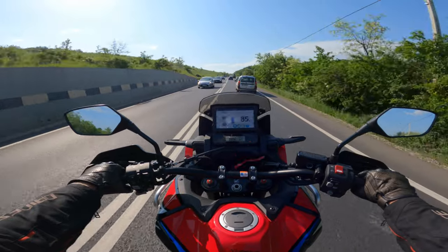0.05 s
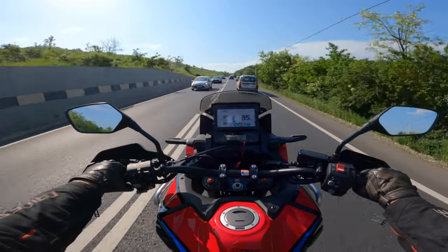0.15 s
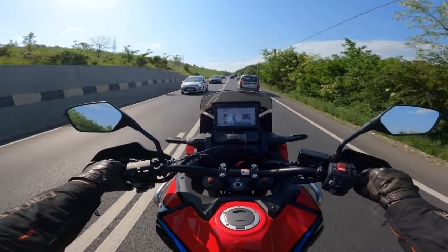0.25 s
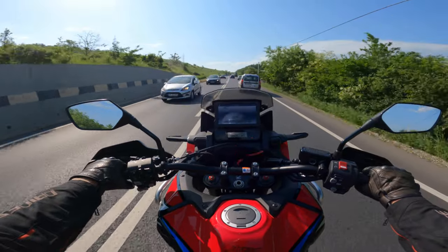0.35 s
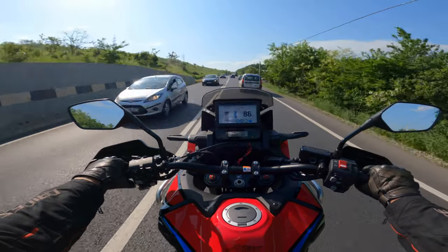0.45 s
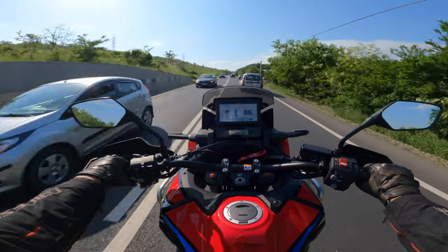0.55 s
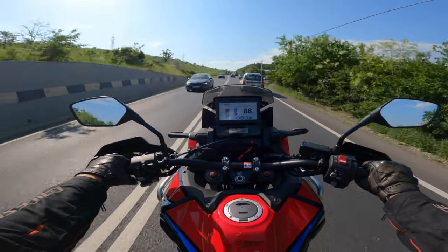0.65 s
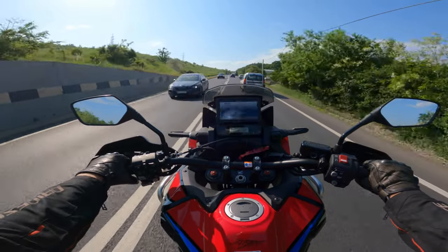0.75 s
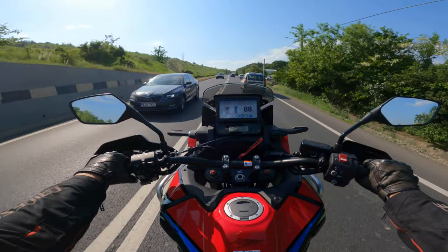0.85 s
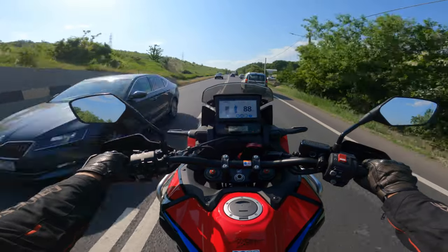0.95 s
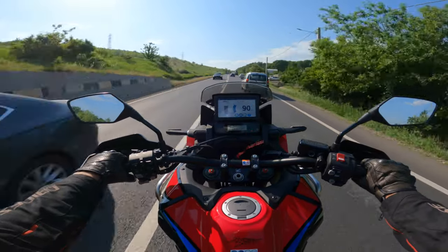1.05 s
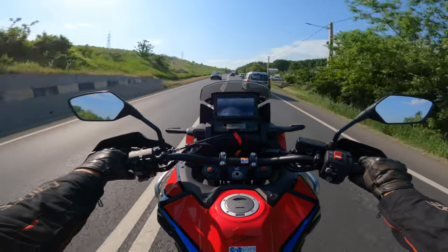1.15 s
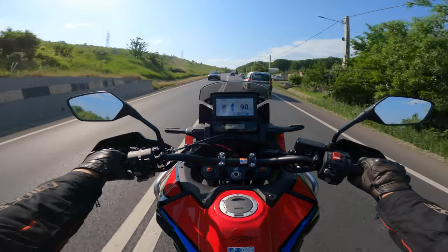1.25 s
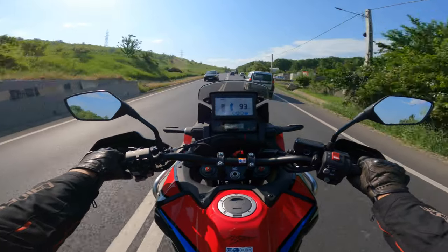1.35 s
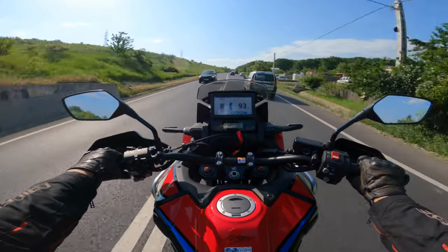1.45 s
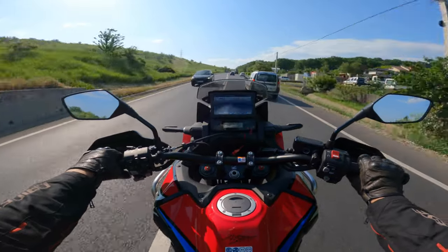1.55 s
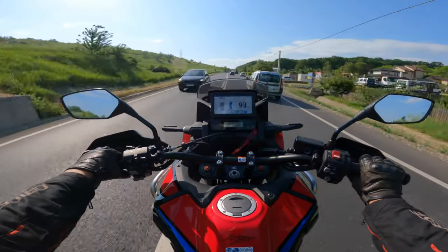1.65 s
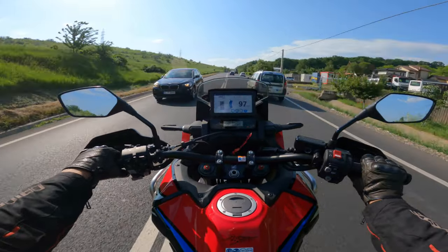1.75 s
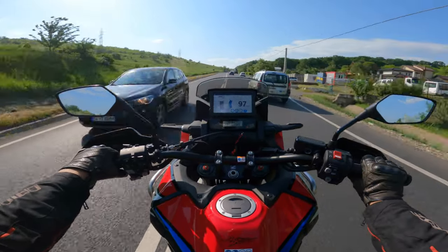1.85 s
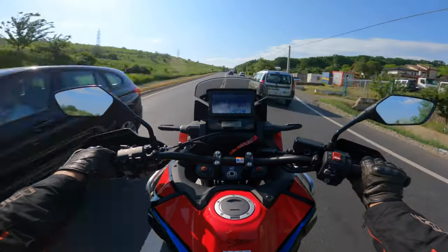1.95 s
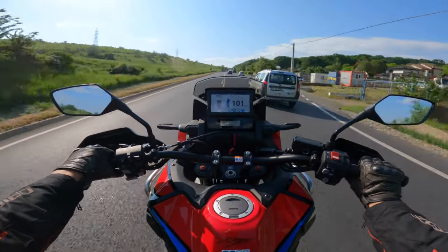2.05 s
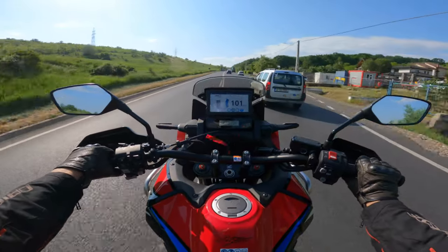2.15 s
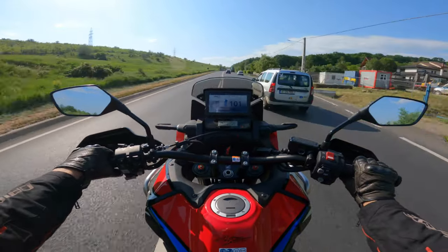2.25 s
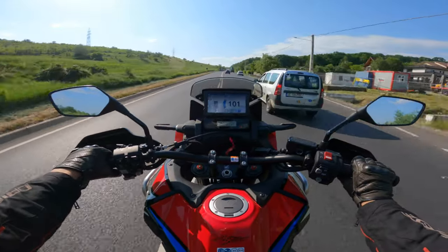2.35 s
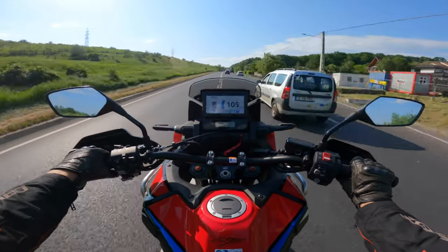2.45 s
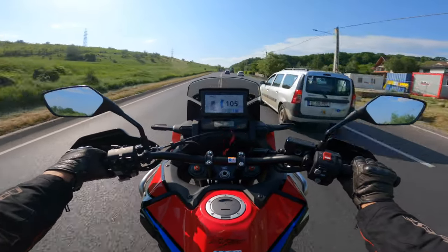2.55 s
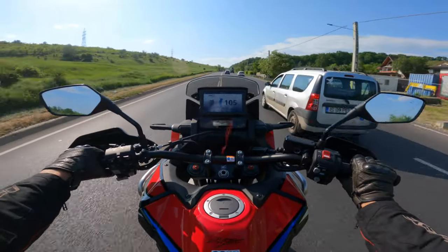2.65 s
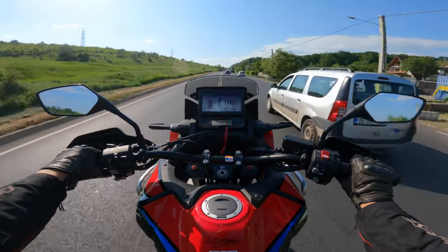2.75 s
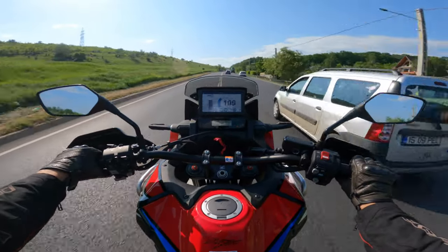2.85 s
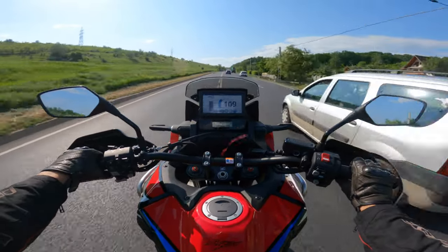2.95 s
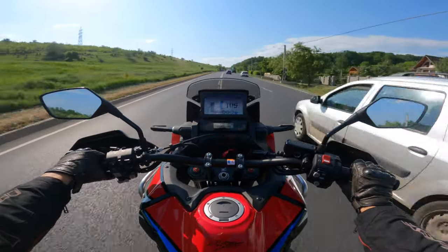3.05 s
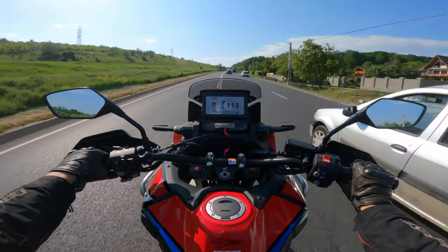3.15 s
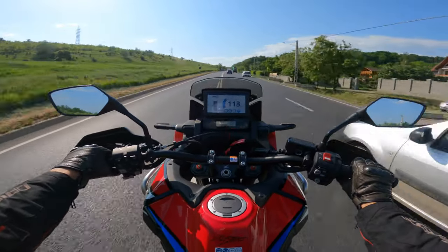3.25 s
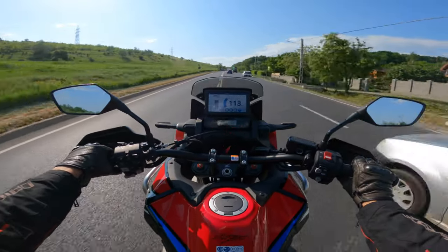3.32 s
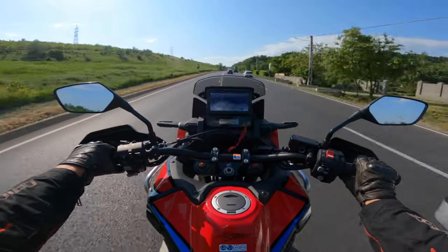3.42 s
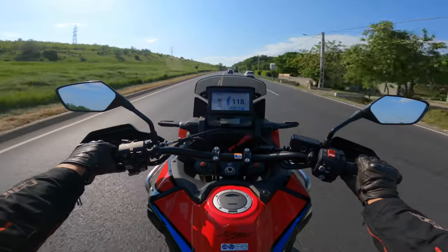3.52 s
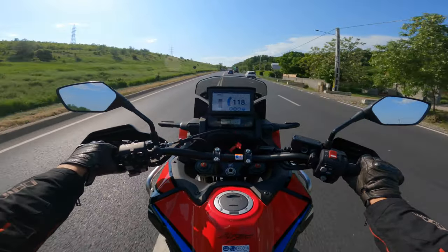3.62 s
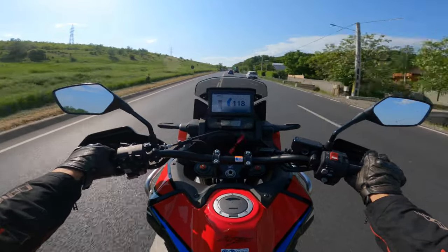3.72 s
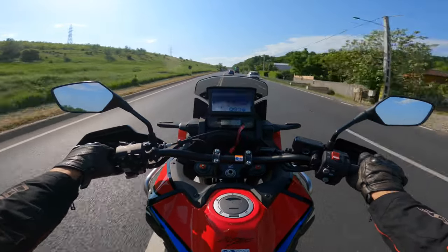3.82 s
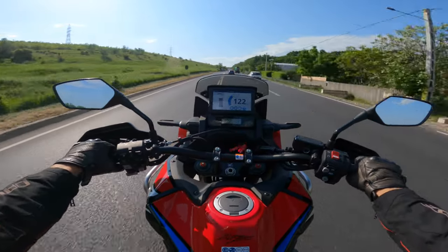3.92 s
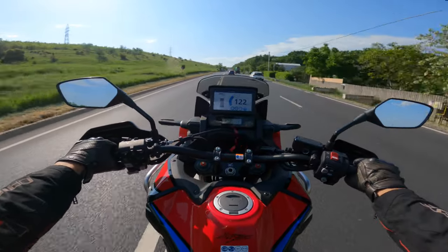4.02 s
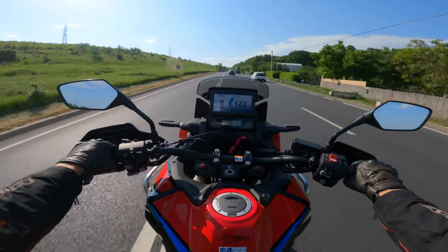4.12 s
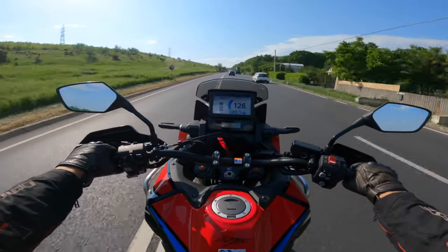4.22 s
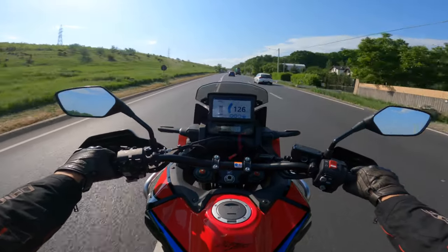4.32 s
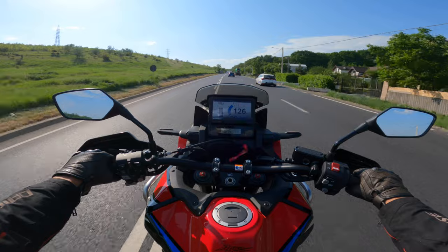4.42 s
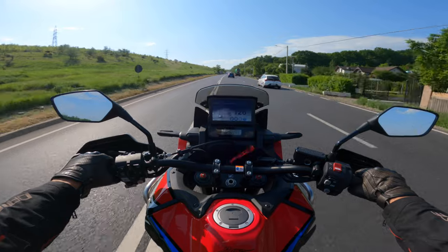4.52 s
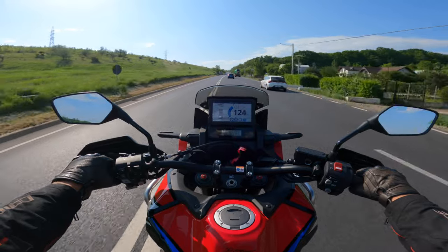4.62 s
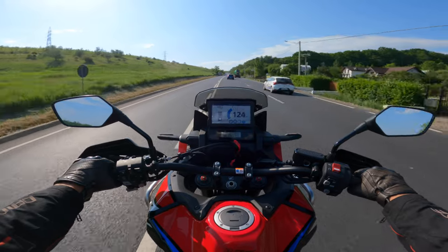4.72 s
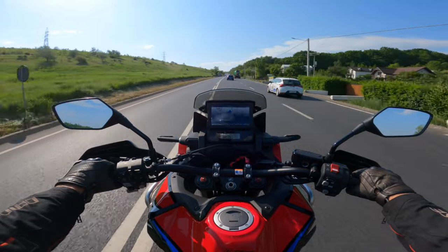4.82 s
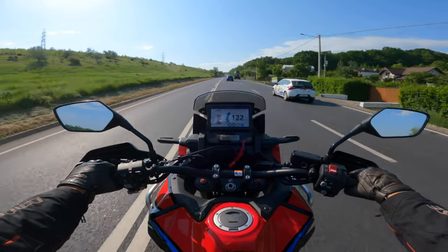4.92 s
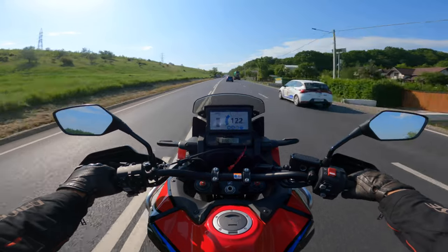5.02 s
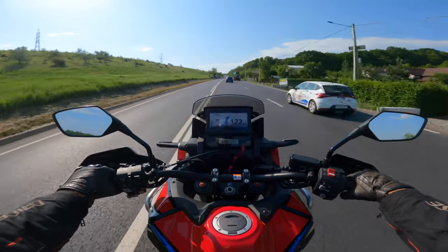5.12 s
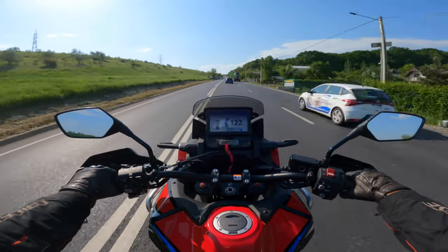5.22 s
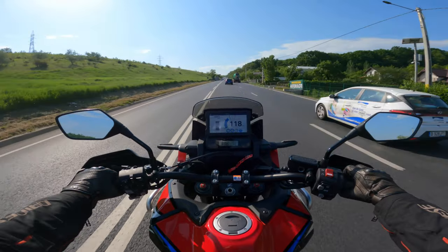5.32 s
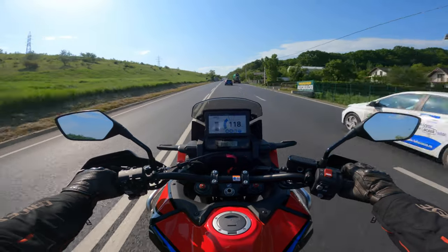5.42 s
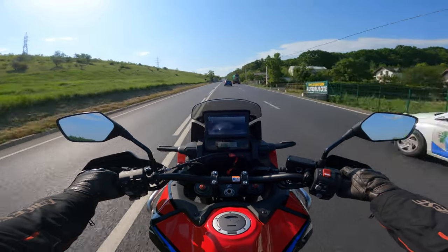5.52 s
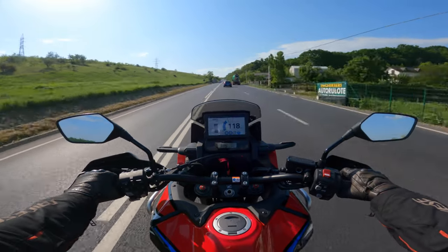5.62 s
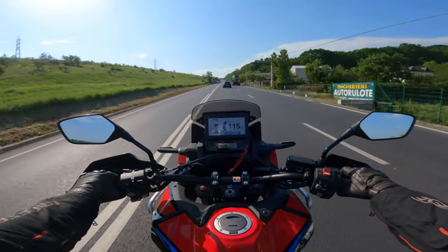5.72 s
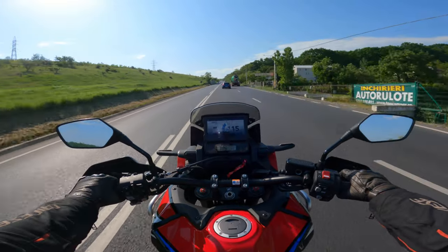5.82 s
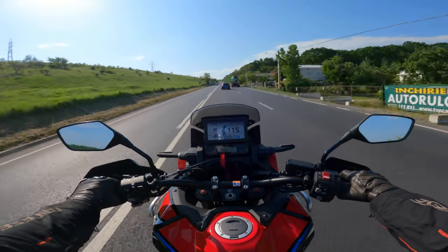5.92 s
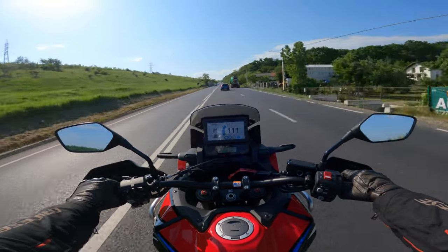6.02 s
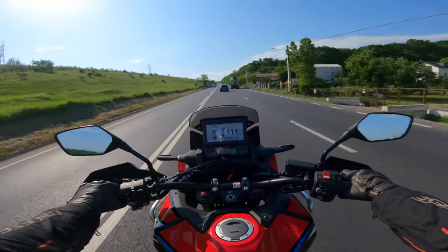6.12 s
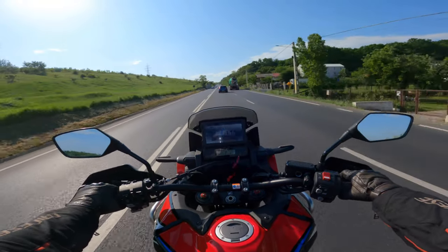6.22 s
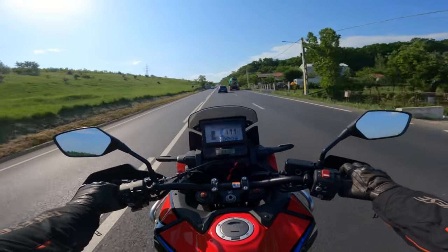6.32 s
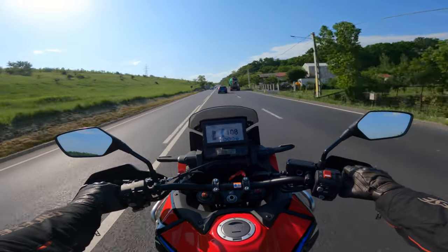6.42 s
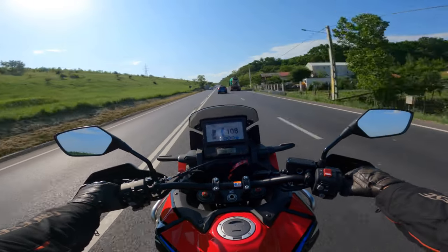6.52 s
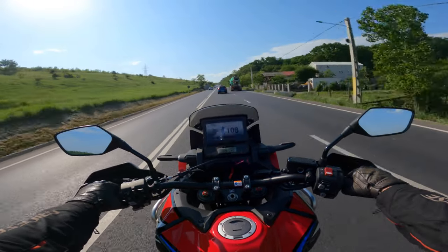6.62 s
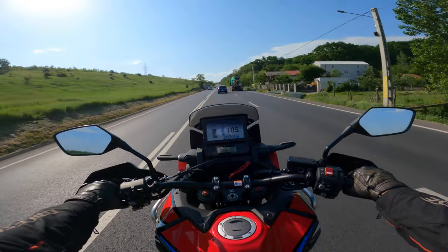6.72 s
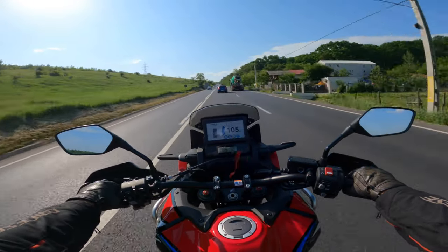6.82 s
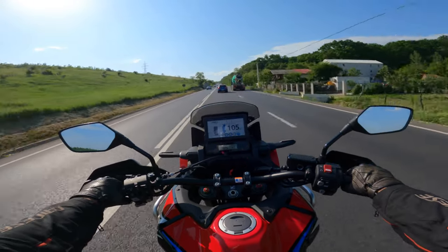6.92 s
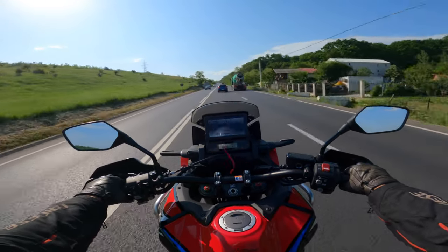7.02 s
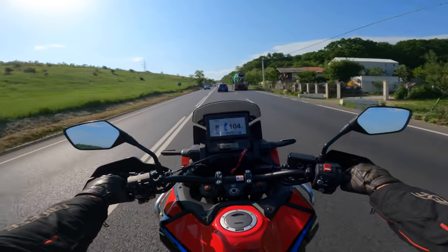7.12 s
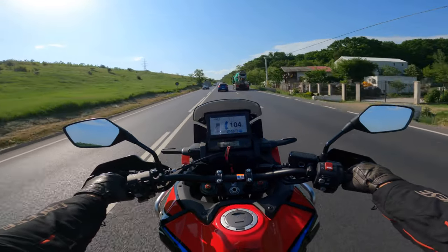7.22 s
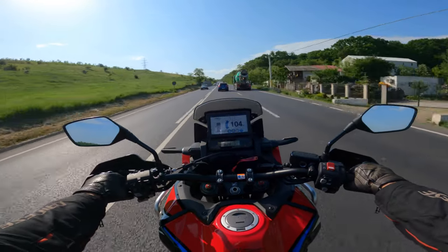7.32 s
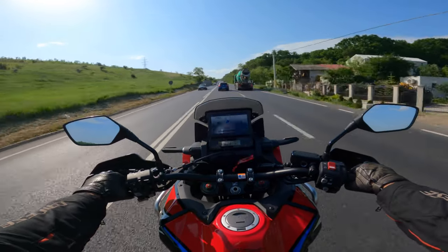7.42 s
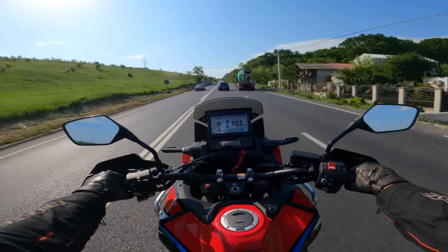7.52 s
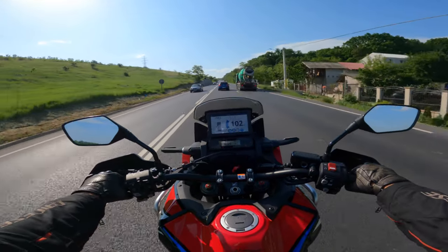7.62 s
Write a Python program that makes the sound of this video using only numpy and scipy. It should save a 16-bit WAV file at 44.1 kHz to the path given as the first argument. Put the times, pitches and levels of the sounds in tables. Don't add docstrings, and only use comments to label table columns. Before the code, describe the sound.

On an open road, a close stereo microphone at the rider's seat catches a twin-cylinder motorcycle. A soft uneven throb under rushing air grows steadily louder and higher, with hissing exhaust puffs and faint swishes of oncoming cars. It peaks around four seconds, then the throttle shuts and the engine sinks in pitch under wind, drive whine, cloth crackle and tiny metallic ticks. A firm knock and brief stabs of gas come near the end.

```python
import sys
import numpy as np
from scipy import signal
from scipy.fft import rfft, irfft, next_fast_len
from scipy.io import wavfile
from scipy.ndimage import uniform_filter1d

SR = 44100
rng = np.random.default_rng(int(sys.argv[2]) if len(sys.argv) > 2 else 0)


def convert_level_to_amplitude(level_db):
    exponent = np.asarray(level_db, float) / 20
    return 10 ** exponent


def inscribe(sig):
    pcm = np.round(np.clip(np.atleast_2d(sig).T, -1, 1) * 32767)
    wavfile.write(sys.argv[1], SR, pcm.astype(np.int16))


N = 337806
TIME_S = np.arange(N) / SR

# start_s, cycle_hz (four-stroke cycles), effort_db
ENGINE_RUN = [(0, 29.45, -36.5), (.87, 31.7, -29.5), (1.3, 32.95, -28), (1.54, 33.88, -26.5),
              (2.67, 38.4, -25), (3.67, 42.55, -21.5), (3.99, 43.9, -21), (4.19, 44.45, -23),
              (4.39, 44.33, -26.5), (4.88, 43.4, -31.5), (4.98, 41.35, -34), (5.1, 42.09, -31),
              (5.8, 39.57, -31.5), (6.76, 36.6, -34), (6.87, 38.56, -32.5), (6.96, 36.94, -33),
              (7.3, 36.3, -34), (7.66, 35.13, -37.5)]
# start_s, opening (0-1), slack (0-1, drive line neither pulling nor braking)
THROTTLE_HAND = [(0, 0.9, 0.8), (.5, 0.74, 0.48), (1.3, 0.64, 0.27), (1.5, 0.81, 0.15), (4.1, 0.88, 0.01),
                 (4.4, 1, 0.7), (4.95, .4, .9), (5.03, 0.23, 0.12), (6.82, 0, 0.14), (6.88, 0.6, .7),
                 (7.3, 0.2, .7), (7.45, 0.5, .1), (7.66, 0.3, 0.2)]
# pitch_hz, left_over_right_db
PORT_LEAN = [(60, -4), (92, 0.5), (140, 5.5), (210, 3.5), (330, 1), (500, 0), (770, -1), (1170, -5.5),
             (1790, 3), (2740, -1), (4190, 2.5), (6410, -1.5), (9810, 1), (15000, 1.5)]
# pitch_hz, lead_radians
PORT_LEAD = [(0, 3), (690, -0.53), (1200, 4), (1800, 4.5), (2700, 5.5), (5200, 4), (8100, 12.5), (16000, 4)]


def evened(x):
    return x / np.sqrt(np.mean(x ** 2) + 1e-20)


def read(points, hz):
    f, value = np.transpose(points)
    return np.interp(np.log(hz + 1), np.log(f + 1), value)


def curves(rows):
    s, *columns = np.transpose(rows)
    return [np.interp(TIME_S, s, column) for column in columns]


def drift(hz, channels=1):
    chance = rng.standard_normal((channels, N + SR))
    slow = signal.lfilter(*signal.butter(2, hz, fs=SR), chance)
    return evened(slow[:, SR:])


def band(x, lo_hz, hi_hz):
    edges = [lo_hz, min(hi_hz, SR / 2.1)]
    return signal.sosfilt(signal.butter(2, edges, "bandpass", fs=SR, output="sos"), x)


def treble(x, above_hz):
    return signal.sosfiltfilt(signal.butter(2, above_hz, "highpass", fs=SR, output="sos"), x)


def panned(db, left_right_db):
    return convert_level_to_amplitude(db + np.array([[left_right_db / 2], [-left_right_db / 2]]))


def noise(colour, patchy_db):
    # pitch_hz, likeness (0-1)
    likeness = [(60, 0.14), (200, 0.58), (400, 1), (700, 0.75), (1250, 0.82), (1900, 0.53), (2700, 1),
                (4400, 0.78), (6800, 0.17), (15000, .3)]
    frames, hz = N // 256 + 5, np.fft.rfftfreq(1024, 1 / SR)
    a, b, c, d, patches = rng.standard_normal((frames, 513, 5)).T
    patches = uniform_filter1d(patches, size=10, axis=0)
    patches = evened(uniform_filter1d(patches, size=10, axis=1))
    same = np.clip(read(likeness, hz), -1, 1)[:, None]
    left, own = a + 1j * b, c + 1j * d
    delayed = left * np.exp(-1j * read(PORT_LEAD, hz))[:, None]
    right = same * delayed + np.sqrt(1 - same ** 2) * own
    z = np.array([left, right])
    z *= convert_level_to_amplitude(read(colour, hz)[:, None] + patchy_db * patches)
    z *= convert_level_to_amplitude(np.outer([.5, -.5], read(PORT_LEAN, hz)))[:, :, None]
    return signal.istft(z, nperseg=1024, noverlap=768)[1][:, :N]


def ports(x):
    margin = 2048
    x = np.pad(x, margin, "reflect")
    size = next_fast_len(len(x), True)
    hz = np.fft.rfftfreq(size, 1 / SR)
    half = convert_level_to_amplitude(read(PORT_LEAN, hz) / 2) * np.exp(.5j * read(PORT_LEAD, hz))
    return irfft(rfft(x, size) * np.array([half, 1 / half]), size)[:, margin:margin + N]


def fuzzy_line(hz, width_hz, clean):
    wobble = drift(width_hz, channels=2)
    angle = 2 * np.pi * np.cumsum(hz * np.ones(N)) / SR
    return evened((clean + wobble[0]) * np.cos(angle) + wobble[1] * np.sin(angle))


def law(usual_db, share, shut_db, slack_db, speed_db):
    usual_effort_db, usual_hz = -30, 37
    hz, effort_db = curves(ENGINE_RUN)
    throttle, slack = np.clip(curves(THROTTLE_HAND), 0, 1)
    level_db = usual_db + share * (effort_db - usual_effort_db)
    level_db = level_db + shut_db * (1 - throttle) + slack_db * slack
    return level_db + speed_db * np.log2(hz / usual_hz)




def wind():
    wind_law = (-43.5, 0.33, 3.4, 3.2, 14)
    # pitch_hz, level_db (per Hz)
    wind_colour = [(10, -28), (22, -11), (40, 10.5), (70, 6.5), (110, -1.5), (160, -21.5), (250, -31),
                   (500, -60)]
    # centre_s, more_db, half_length_s
    gusts = [
        (1.013, 1, 0.12),
        (1.752, 2.5, .1),
        (2.126, 5, 0.07),
        (4.204, 2.5, .15),
        (4.623, 2, 0.09),
        (4.946, 2, 0.17),
        (5.733, 4.5, 0.055),
        (6.61, 5.5, .05),
        (6.767, 5.5, .04),
        (7.4, 4.5, .07),
    ]
    size = next_fast_len(N, True)
    hz = np.fft.rfftfreq(size, 1 / SR)
    shared, *own = rng.standard_normal((3, size))
    lumps = irfft(rfft(np.array(own) + shared / 2) * convert_level_to_amplitude(read(wind_colour, hz)), size)[:, :N]
    lumps = lumps * convert_level_to_amplitude(1.5 * drift(13.0, channels=2))
    gusts_db = sum(db * np.exp(-((TIME_S - s) / half) ** 2) for s, db, half in gusts)
    port_db = np.array([[.6], [3.5]])
    return convert_level_to_amplitude(law(*wind_law) + gusts_db + port_db) * evened(lumps)


def roar():
    roar_law = (-37.5, 0.4, 1.1, 0.4, 5.5)
    fizz_law = (-3, 0.7, 0.5, -6, -0.5)
    # pitch_hz, level_db (per Hz)
    roar_colour = [(60, -14.5), (100, -2), (160, -11.5), (300, -11), (560, -4), (800, -18), (1100, -23),
                   (1700, -28.5), (2250, -31), (2600, -37.5), (5200, -48), (5600, -56.5), (9000, -54),
                   (15600, -73)]
    wash = noise(roar_colour, patchy_db=1.0)
    flicker = convert_level_to_amplitude(3 * drift(14.) + 2.2 * drift(70.) + law(*fizz_law))
    flickering = wash + (flicker - 1) * treble(wash, 8000.)
    return convert_level_to_amplitude(law(*roar_law) - 1.0) * flickering / np.std(band(wash, 220, 890))


def passing_cars():
    # centre_s, level_db, half_length_s, left_right_db
    cars = [
        (0.704, -69.5, 0.044, -2),
        (1.15, -68, 0.063, 3.5),
        (2.082, -63, 0.04, 2),
    ]
    swell = np.zeros((2, N))
    for s, db, half, pan in cars:
        swell += panned(db, pan) * np.exp(-((TIME_S - s) / half) ** 2)
    return swell * evened(band(rng.standard_normal((2, N)), 4500., 10000.0))


def cloth():
    # centre_s, level_db, half_length_s
    flaps = [(0.005, -58.5, 0.016), (0.198, -74, .03), (0.291, -75, 0.044), (2.355, -65, 0.026),
             (3.079, -68.5, 0.04), (5.294, -68.5, .015), (5.687, -68, .03), (5.803, -64.5, .012),
             (5.926, -63, 0.023), (5.976, -62, .02), (6.636, -67.5, 0.015), (6.839, -65, 0.014),
             (6.912, -70, 0.0098), (6.994, -69, 0.013)]
    swell = np.zeros((2, N))
    for s, db, half in flaps:
        swell += convert_level_to_amplitude(db - 4.5) * np.exp(-((TIME_S - s) / half) ** 4)
    snaps = rng.standard_normal((2, N)) * convert_level_to_amplitude(7. * drift(500.))
    return swell * evened(band(snaps, 5500., 14000.))


def loose_fittings():
    # start_s, level_db, left_right_db
    hard_ticks = [(5.4084, -58, 0.0), (5.558, -59, -3), (5.7948, -56, -2), (5.9097, -55, 2),
                  (5.9315, -58.5, -3.5), (5.9565, -57.5, 3), (6.6472, -53.5, 3.5), (6.7227, -67, -1.0),
                  (6.822, -63, 3.5), (6.844, -60.5, -2.5), (6.9023, -60, 2.5), (7.3508, -58, 7),
                  (7.3807, -59, 4.5), (7.5462, -54.5, 5)]
    coast_s, tick_count = 4.7, 90
    when, size, side = rng.random((tick_count, 3)).T
    small_s = coast_s + when * (N / SR - coast_s)
    small_db = -72.5 - 5.5 * np.log(size + .05)
    small_ticks = zip(small_s, small_db, 13.5 * (side - .5))
    shape = np.zeros((2, N))
    for s, db, pan in [*hard_ticks, *small_ticks]:
        at = slice(round((s - .004) * SR), round((s + .01) * SR))
        fall_db = -60 * abs(TIME_S[at] - s - .001) / .005
        shape[:, at] += panned(db - 3, pan) * convert_level_to_amplitude(fall_db)
    hiss = rng.standard_normal((2, N))
    return shape * evened(band(hiss + .5 * hiss[::-1], 6500., 13500.))


def bumps():
    # centre_s, level_db, pitch_hz
    jolts = [
        (4.974, -29, 150.),
        (5.691, -29, 88),
        (6.77, -28, 106),
        (6.815, -25, 248.9),
        (6.85, -27.5, 263),
        (6.823, -37, 1750),
        (6.826, -48, 4000.),
    ]
    out = np.zeros(N)
    for s, db, hz in jolts:
        t = TIME_S - s
        out += convert_level_to_amplitude(db) * np.cos(2 * np.pi * hz * t) * np.exp(-(t * hz / 1.5) ** 2)
    return out


def whistles():
    whistle_law = (-63.5, 0.27, 4, -1, 26.5)
    # pitch_hz, width_hz, level_db
    edges = [(1274, 15, 0), (1635, 60., -1.2), (2210, 60., -7), (2946, 89, -13.5)]
    lines = sum(convert_level_to_amplitude(db) * fuzzy_line(hz, width_hz, clean=.9) for hz, width_hz, db in edges)
    return convert_level_to_amplitude(law(*whistle_law)) * lines * np.array([[1.2], [.3]])


def final_drive(hz):
    drive_law = (-39.5, 0.99, 3.5, -0.5, 2.6)
    tread_law = (-45, .3, .1, .1, 6)
    teeth_per_cycle, wheel_s = 15.2, .5
    mesh_hz = teeth_per_cycle * uniform_filter1d(hz, round(wheel_s * SR))
    whine = convert_level_to_amplitude(law(*drive_law)) * fuzzy_line(mesh_hz, width_hz=22., clean=3.5)
    tread = convert_level_to_amplitude(law(*tread_law)) * fuzzy_line(mesh_hz, width_hz=65.0, clean=0)
    return ports(whine + tread)


def puffs(turns, throttle):
    puff_law = (-59, 1.1732, -0.6, -8, -6.2)
    # pitch_hz, level_db (per Hz)
    puff_colour = [(300, -30.5), (600, -12.5), (1100, -16.5), (1400, -24), (1750, -18), (2200, -28.5),
                   (2500, -30.5), (3600, -36), (5100, -35.5), (5500, -47.5), (7300, -47), (7700, -53.5),
                   (12300, -57), (15600, -77)]
    cycles = int(turns[-1]) + 3
    size = convert_level_to_amplitude(1.5 * rng.standard_normal((cycles, 2)) + [1.5, -1.5])
    gate = np.zeros(N)
    for k, late in enumerate((-.18, .18)):
        since = turns - late + 1.009
        u = since % 1 / 0.07
        gate += size[since.astype(int), k] * (u * np.exp(1 - u)) ** 1.4
    gate = (.2 + (.25 + .85 * throttle) * gate) / (.3 + .3 * throttle)
    hiss = noise(puff_colour, patchy_db=0.0) * gate * convert_level_to_amplitude(0.8 * drift(290.0))
    db = law(*puff_law)
    brighter = convert_level_to_amplitude(.8 * (db + 57.0)) - 1
    hiss = hiss + brighter * treble(hiss, 7000.)
    return convert_level_to_amplitude(db) * hiss / np.std(band(hiss, 2576, 6000))


def rung(modes, hz):
    return sum(convert_level_to_amplitude(db) / (1 + 2j * (hz - mid) / width) for mid, width, db in modes)


def firings(hz, turns, throttle):
    order_laws = [
        (-40, 0.94, 12.5, 0.5, 11.8),
        (-35.5, 0.63, 3, -12, -2.2),
        (-33.5, 1.2844, 0.75, 0.8, -1.3),
        (-45, .5, -3, 4.5, 6.3),
        (-45, 0.3669, -1, -9.5, 0),
        (-43, .5, -4, -13, -3.5),
    ]
    # order, open_db (throttle open), shut_db (throttle shut)
    gulp = [(0.988, -11, -11.5), (2, 0, -3), (2.98, 0, 2.5), (4, -6.5, 5.5), (5.15, -2.5, 0),
            (5.764, -1.5, 7), (6.47, 0, -11), (7.87, 8.5, 0), (10.1, 5, 8.5), (12.47, -4, -11),
            (13.9, 4, -3), (16.9, -0.5, -6.5), (24.4, -10.5, -8), (39.7, -27.5, -27)]
    # pitch_hz, width_hz, level_db
    airbox = [(268, 35.3, 18), (482, 39, 16), (747, 65, 8.5)]
    # pitch_hz, width_hz, level_db
    panels = [(1067, 67, 7), (880, 280, -6.5)]
    step = 8
    uneven = np.array([[.08], [.08], [.08], [.08], [.08], [.12]]) * drift(40., channels=6)
    levels_db = [law(*row) for row in order_laws]
    levels = (convert_level_to_amplitude(levels_db) * np.sqrt(2) * (1 + uneven))[:, ::step]
    shaky = (turns + (.0008 + .0007 * throttle) * drift(25.)[0])[::step]
    hz, throttle, out = hz[::step], throttle[::step], 0
    order, open_db, shut_db = np.transpose(gulp)
    for k in range(1, 41):
        gap = .375 - .03 * throttle * (k < 11)
        early = np.exp(1j * np.pi * k * gap)
        second_db = -1.2 - 8 * throttle * np.clip((k - 14) / 5, 0, 1)
        pair = 0.54 * (early + convert_level_to_amplitude(second_db) / early)
        size_db = throttle * np.interp(k, order, open_db) + (1 - throttle) * np.interp(k, order, shut_db)
        box = (k > 6) * 0.44 * throttle * rung(airbox, k * hz)
        gain = convert_level_to_amplitude(size_db) * (pair * (1 + rung(panels, k * hz)) + box)
        lag = 1 - throttle + 3.5 * throttle * np.log2(hz / 33) + .01 * max(k - 7, 0) ** 2
        wave = (gain * np.exp(1j * (2 * np.pi * k * shaky - lag))).real
        out = out + levels[np.searchsorted([2, 3, 6, 7, 15], k)] * wave
    return ports(signal.resample_poly(out, step, 1, padtype="line")[:N])


def engine():
    hz = curves(ENGINE_RUN)[0]
    turns = np.cumsum(hz) / SR + .57
    throttle = np.clip(curves(THROTTLE_HAND)[0], 0, 1)
    return final_drive(hz) + puffs(turns, throttle) + firings(hz, turns, throttle)


def scene():
    air = wind() + roar() + whistles()
    small_sounds = passing_cars() + cloth() + loose_fittings() + bumps()
    return air + small_sounds + engine()


def top_cut(x):
    return signal.sosfilt(signal.butter(12, 15700, fs=SR, output="sos"), x)


def record(dry):
    fade = np.minimum(np.arange(N, 0, -1) / (.004 * SR), 1)
    return top_cut(dry * fade)


dry = scene()
out = record(dry)
inscribe(out)
```